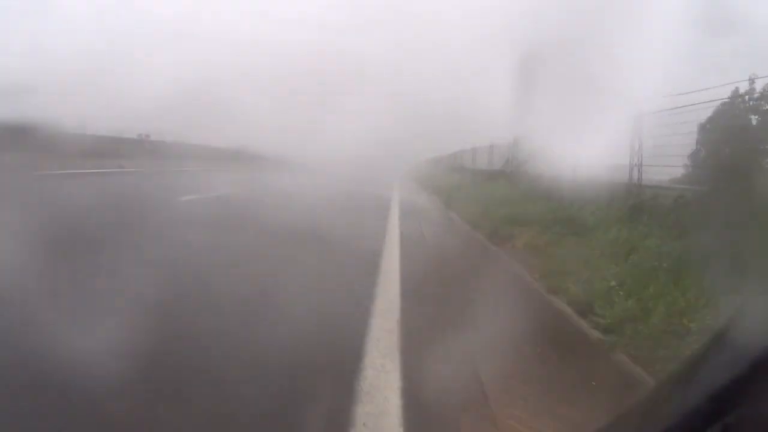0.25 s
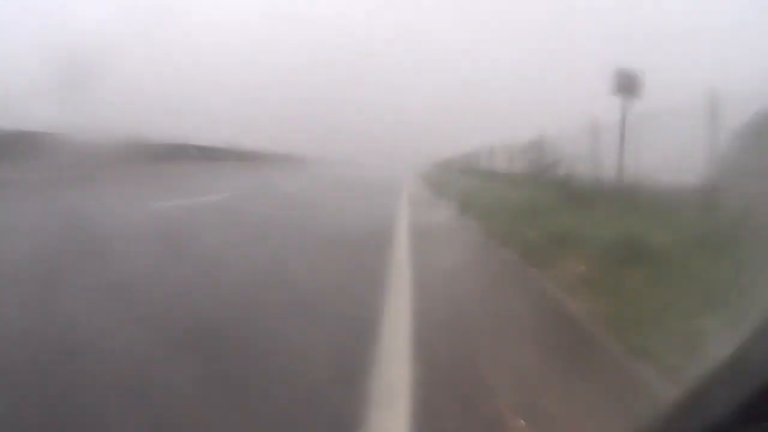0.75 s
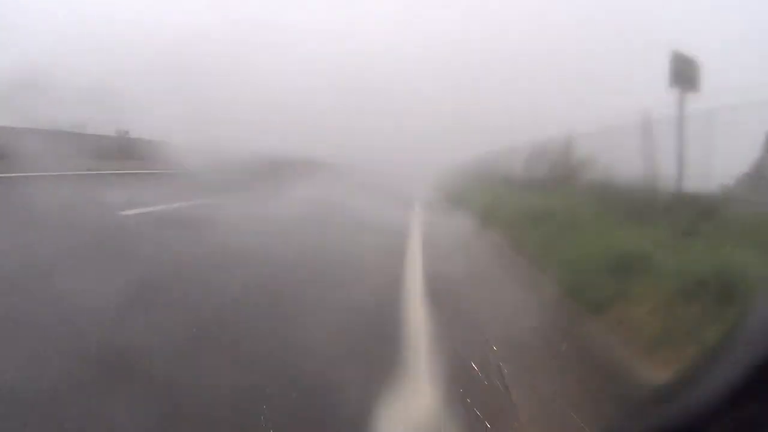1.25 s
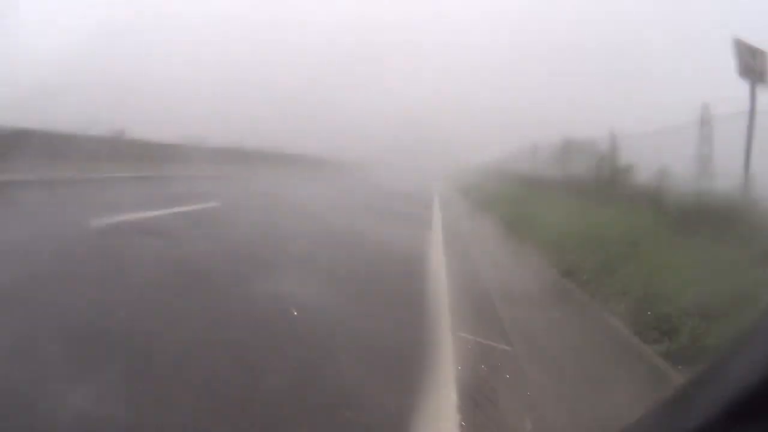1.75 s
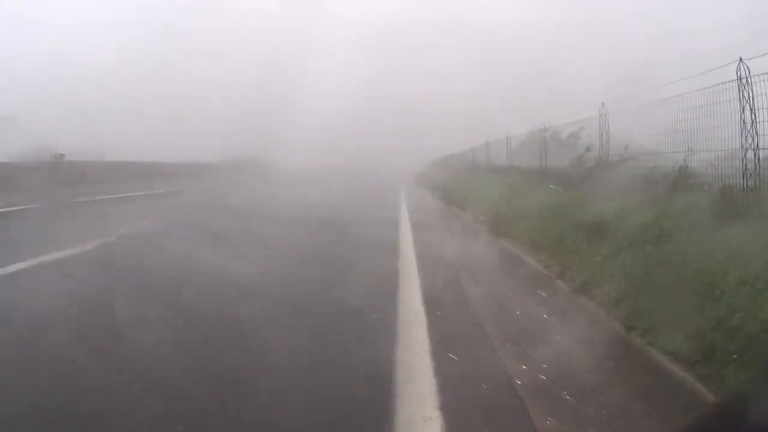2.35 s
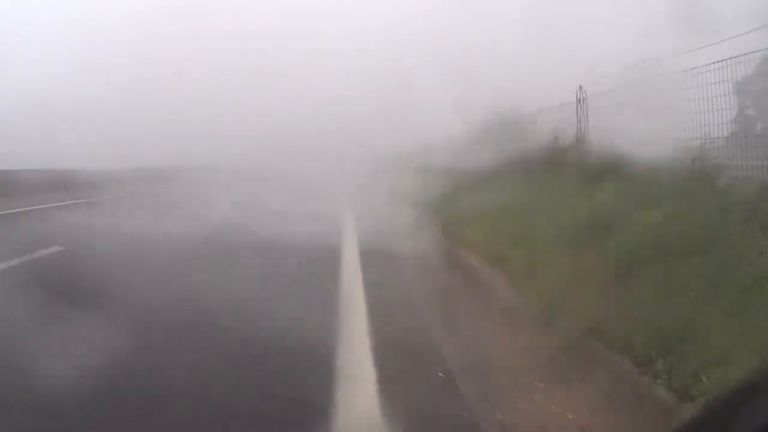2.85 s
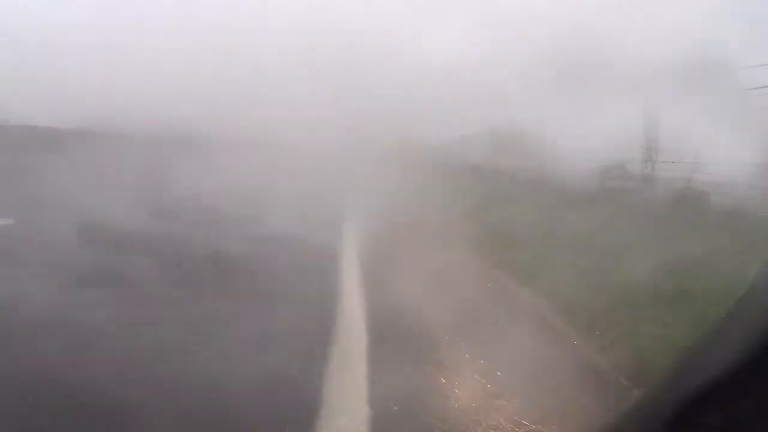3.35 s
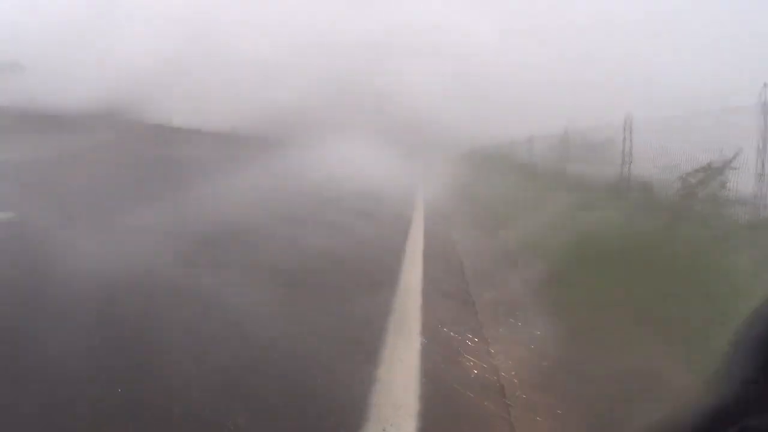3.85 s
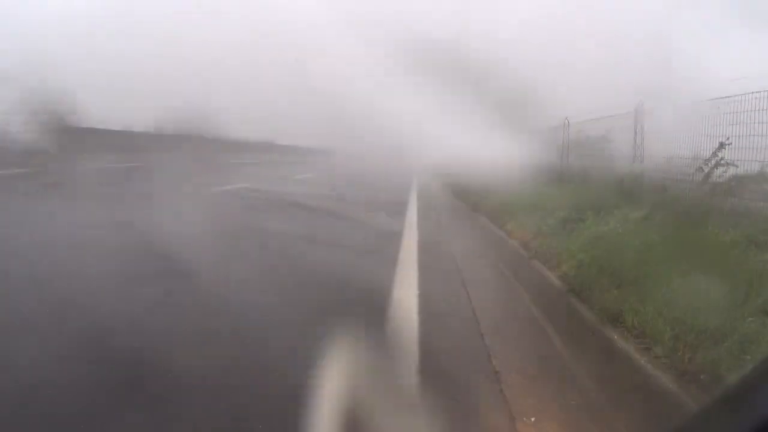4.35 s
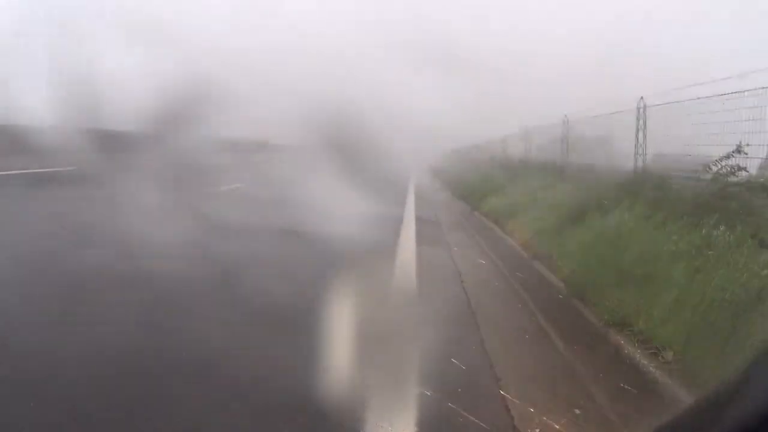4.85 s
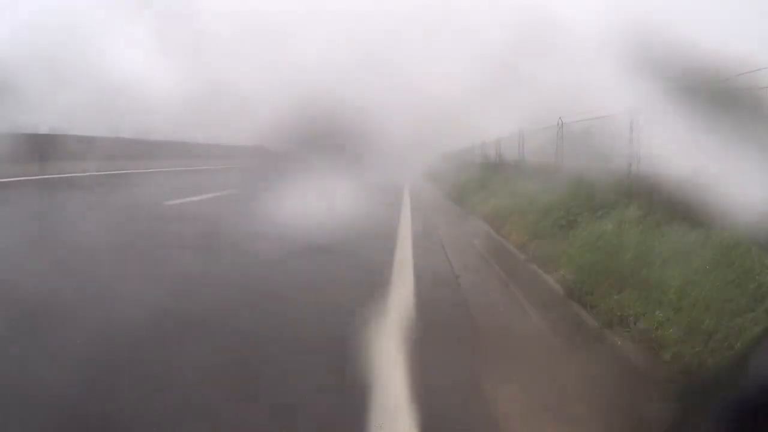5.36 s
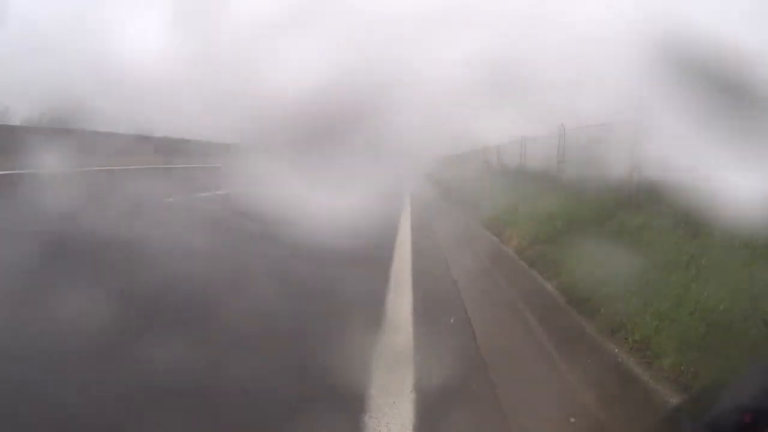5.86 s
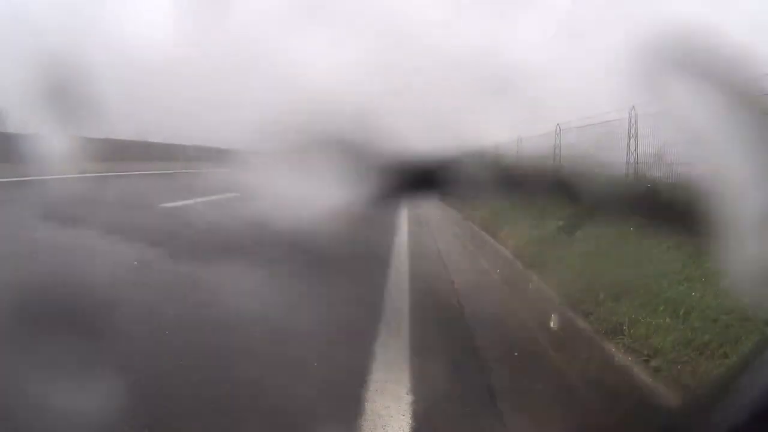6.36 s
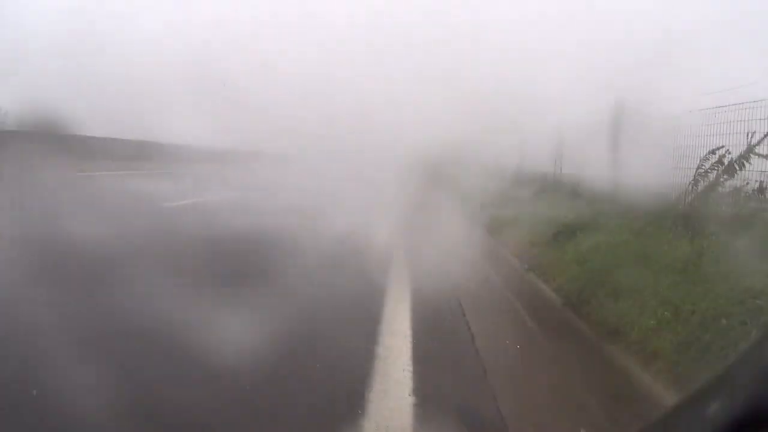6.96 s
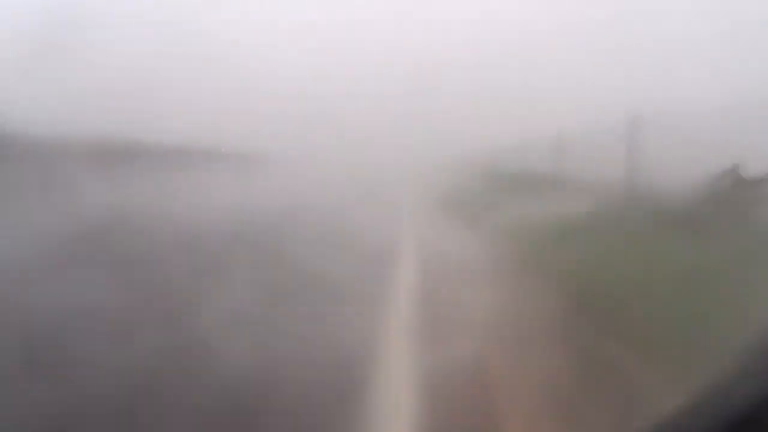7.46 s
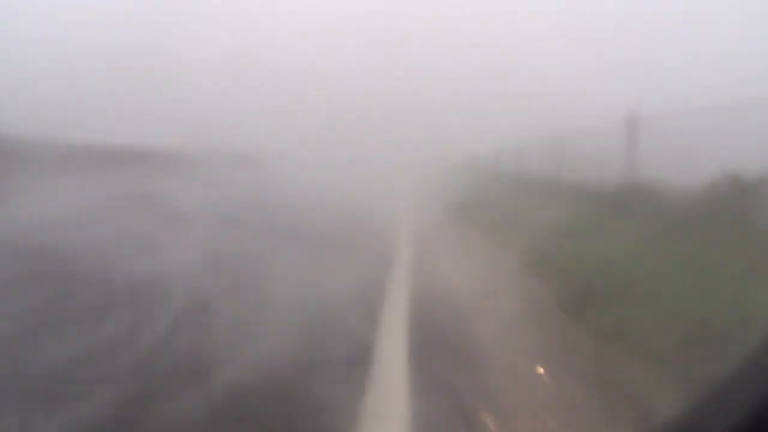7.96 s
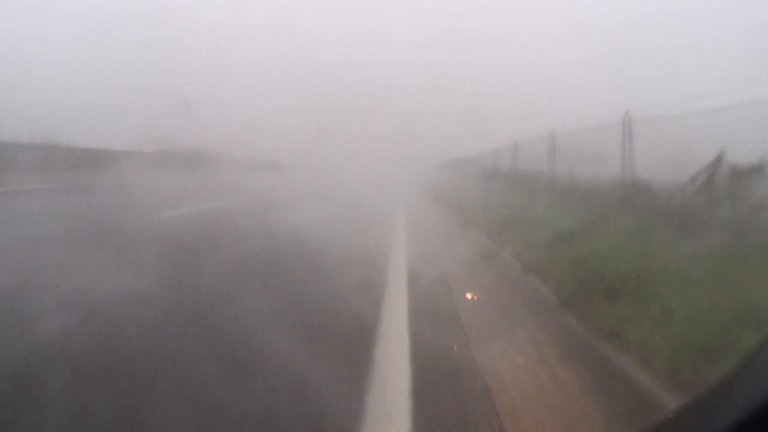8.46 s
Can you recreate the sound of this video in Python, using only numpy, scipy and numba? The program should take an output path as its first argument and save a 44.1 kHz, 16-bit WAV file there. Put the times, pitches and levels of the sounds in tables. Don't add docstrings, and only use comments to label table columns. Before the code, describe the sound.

Torrential rain pelts a mounted camera shell during a motorcycle ride. Dense crackling patter starts and stops in fractions of a second, punctuated by loud irregular pops and clicks, the hardest cluster just after two seconds. Underneath, gusty wind arrives as a dull low rumble with a quick engine flutter. The sound is very near, mid-heavy, slightly stereo, momentarily ducked after the largest drops; the ending is a sustained rain roar that thins out.

```python
import sys
import numpy as np
from scipy import signal
from scipy.fft import rfft, irfft, next_fast_len
from scipy.io import wavfile
from scipy.ndimage import uniform_filter1d
from numba import njit

SR = 44100
rng = np.random.default_rng(int(sys.argv[2]) if len(sys.argv) > 2 else 0)


def natural_amplitude(level_db):
    exponent = np.asarray(level_db, float) / 20
    return 10 ** exponent


def int16_out(signal):
    q = np.round(np.clip(np.atleast_2d(signal).T, -1, 1) * 32767)
    wavfile.write(sys.argv[1], SR, q.astype(np.int16))


N = 383669
SIZE = next_fast_len(N + SR // 4)
BIN_HZ = np.arange(SIZE // 2 + 1) * SR / SIZE
CONTROL_STEP = 64

# (time [s], half length [s], frequency [Hz], level [dB])
DRONES = [
    (2.097, 0.14, 86, -42),
    (3.75, 0.54, 57, -64),
]

# (time [s], half length [s], level [dB])
GUST_SWELLS = [(.1, 0.26, -38.5), (.47, 0.14, -36.5), (1.15, 0.23, -36.5), (.92, .08, -52),
               (1.45, 0.18, -37.5), (1.8, 0.14, -48), (2.2, 0.17, -38.5), (2.85, 0.17, -49),
               (3.5, 0.14, -34), (4.05, 0.15, -33), (4.63, 0.075, -36), (5.45, 0.11, -34),
               (5.72, 0.087, -40), (5.95, 0.23, -34), (6.55, 0.19, -34), (6.78, .1, -30), (7.1, 0.085, -32),
               (7.35, 0.059, -35.5), (7.7, 0.4, -39.5), (8.0, 0.11, -37), (8.58, 0.093, -31.5)]
# (time [s], half length [s], level [dB])
MOUNT_BUFFETS = [
    (1.3, 0.22, -66),
    (2.1, .25, -62),
    (4.0, 0.17, -66),
    (5.95, 0.14, -60),
    (6.85, 0.2, -51),
    (7.967, 0.07, -46),
    (8.7, 0.095, -46),
]
# (frequency [Hz], density [dB per Hz])
RUMBLE_SPECTRUM = [(59, -45), (100, -17), (156, -5), (253, 1.5), (307, -3.5), (344, -10.5), (380, -23.5),
                   (490, -22.5), (840, -120)]
# (frequency [Hz], density [dB per Hz])
DEEP_SPECTRUM = [(20, -5), (40, -8), (60, -3), (85, 1), (110, -5), (150, 6), (300, -31)]
AIRSTREAM_DB, GUST_FLUTTER_DB = -45.5, 0.5
DEEP_DB, DEEP_FOLLOWS_GUSTS, DEEP_FLUTTER_DB = -54.5, 0.15, 4
DUCK_DB_PER_DB, DUCK_S = 0.11, 0.04
FIRING_HZ = 49.6

# (start [s], held [s], level [dB], treble over level [dB])
RAIN_SHEETS = [(0.0, 0.033, -17.5, -3), (0.262, 0.073, -32.5, 7), (0.602, 0.051, -19, 1.5),
               (0.692, 0.15, -16, 1), (1.01, 0.014, -19.5, 1), (1.25, 0.021, -23, -11),
               (1.38, 0.097, -21, 1), (1.58, 0.098, -22, -1), (1.67, 0.052, -21.5, 1),
               (1.858, 0.027, -19.5, 2.5), (2.001, 0.13, -21, 0.5), (2.46, 0.22, -20, 1.5),
               (2.8, 0.047, -24, 2.5), (2.9, 0.17, -20.5, 1), (3.15, 0.13, -21.5, 0),
               (3.519, 0.22, -22.5, 2), (3.84, 0.084, -20, 0.5), (4.001, 0.21, -21, 1),
               (4.352, 0.089, -26, 5), (4.522, 0.13, -24, 2.5), (4.7, .3, -22.5, 2), (5.2, 0.099, -29, 2.5),
               (5.56, .1, -33, 1), (6.062, 0.075, -20, -1), (6.17, 0.052, -30, 1), (6.665, 0.017, -33, 7),
               (6.84, 0.16, -18, -0.5), (7.12, 0.12, -25, 2.5), (7.262, 1.16, -18.5, 0),
               (8.46, 0.2, -27.5, 7.5)]
ARRIVE_DB_PER_S, THIN_DB_PER_S = 726, 173
DRIZZLE_DB, DRIZZLE_TREBLE_DB, DRIZZLE_WANDER_DB = -32, -1, 2.5
# (start [s], length [s], depth [dB])
FAIRING_LULLS = [(0.033, 0.033, 14.5), (0.167, 0.014, 6), (0.333, 0.015, 11), (0.388, .04, 3.5),
                 (1.1, 0.024, 9), (1.162, 0.025, 3.5), (1.513, 0.038, 7), (1.803, 0.018, 8),
                 (2.157, 0.041, 8), (2.229, 0.012, 14), (2.272, 0.015, -4), (2.307, 0.0054, -10),
                 (2.368, 0.012, 7), (3.322, 0.051, 7.5), (4.2, 0.034, 8), (4.262, 0.021, 5),
                 (4.431, 0.075, 4), (4.648, 0.022, 4), (5.091, 0.042, 13), (5.311, 0.023, 11),
                 (5.362, 0.022, 15), (5.501, .02, 11), (5.535, 0.013, 27), (5.79, 0.086, 3.5),
                 (5.865, 0.048, 12), (6.27, 0.035, 19), (6.303, 0.052, 20), (6.379, 0.051, 11),
                 (6.753, 0.11, 6.5), (7.033, 0.089, 6.5)]
SHELTER_EDGE_S = 0.0024

# (time [s], peak level [dB])
KNOCK_DROPS = [(0.1955, -1), (0.3282, -13), (0.4359, -14), (0.5112, -12.5), (0.6055, -12), (0.6774, -31),
               (1.0874, -9), (1.2296, -11), (1.3423, -10), (1.8302, -17), (2.2493, 2.5), (2.6529, -6),
               (2.9033, -25), (3.05, -23), (4.5116, -19), (5.0838, -15), (5.5513, -19), (5.6221, -12.5),
               (5.7334, -10), (5.876, -14), (5.9803, -17), (6.0257, -20), (6.3086, -17), (6.3415, -19),
               (6.3674, -8.5), (6.4288, -18), (6.6777, -12), (6.8149, -19), (6.9895, -6.5), (7.654, -8.5)]
RING_DROPS = [(0.0426, -9), (0.1494, -6), (0.3304, -7), (0.356, -14), (0.4297, -13), (0.511, -13),
              (0.9634, -9.5), (1.066, -3), (1.0873, -17), (1.1331, -9), (1.253, -14), (1.3362, -8),
              (1.5933, -4), (2.0702, 3), (2.2653, 1), (2.331, -7.5), (2.38, -5), (2.9033, -13),
              (2.9444, -11), (3.8124, -22), (4.2343, -21), (5.083, -11), (5.3906, -9.5), (6.3081, -18),
              (6.428, -13), (6.8149, -9.5), (6.859, -10), (7.1975, -9.5), (7.2594, -21), (7.449, -12)]
SNAP_DROPS = [(0.2186, -15), (0.4287, -12.5), (0.5734, -2.5), (0.601, -16), (0.9828, -12), (1.2532, -10),
              (1.3096, -15), (1.3438, -5), (1.3716, -11), (1.7975, -12), (2.1784, -13), (2.2435, 4.5),
              (2.2657, -1.5), (2.2897, -7), (2.3795, -10), (2.901, -12), (3.814, -8), (4.7147, -9),
              (5.0826, -7), (5.1114, -13), (5.5156, -12), (5.5513, -7.5), (5.7047, -13.5), (5.837, -21),
              (6.026, -28), (6.309, -36), (6.3089, -15.5), (6.429, -29), (6.754, -16), (6.8375, -7)]
# (time [s], peak level [dB], brightness [dB])
TILTED_DROPS = [(1.046, -3, 9.5), (1.2773, -2, -4), (1.4115, -10, -10), (1.7684, -21, -11), (1.8006, -25, 15),
                (1.9312, -8, 3), (1.9609, -11, 1), (2.3436, -5, 0.5), (2.4011, -4, -2), (2.4262, -6, -4),
                (2.436, -9.5, 6), (2.7478, -9, 5), (2.7859, -7.5, -2), (3.2811, -6, 7.5), (3.7911, -2, 1),
                (3.8521, -2, -1.5), (4.007, 4.5, -5), (4.2545, -12, 2.5), (4.2985, -9, 6), (4.4298, 1, -3),
                (4.4574, -17, 5), (4.6384, -6.5, 6), (5.0016, -5.5, 3), (5.1972, -5.5, 2.5),
                (5.5235, -1, 2.5), (5.679, -5, -3.5), (6.2551, -6, 3), (6.2758, -10.5, -3),
                (6.3835, -7.5, -6.5), (6.4766, -13, -6)]
# (time [s], peak level [dB])
SHELL_SPLATS = [
    (0.516, -25),
    (1.086, -23),
    (1.45, -31),
    (4.429, -15.5),
    (4.996, -18.5),
    (5.082, -26),
    (6.364, -22),
    (6.369, -17.5),
    (6.675, -29),
    (7.074, -24),
]
KNOCK_MIX_DB, RING_MIX_DB, SNAP_MIX_DB = (1, -4, -10.5), (-11, -0.5, -12), (-6, -7.5, -0.5)
STRAYS_PER_S, STRAY_DB, STRAY_SCATTER_DB = 6, -18, 6.5
STRAY_SHELTER_DB_PER_DB = 1.43

# (frequency [Hz], t60 [s], gain in both ports alike [dB], gain in ports opposed [dB])
THUD_SHELL_MODES = [(394, 0.0073, -21, -30.5), (547, 0.01, -19, -26), (756, 0.012, -16, -21)]
KNOCK_SHELL_MODES = [(977, 0.0024, -12, -16), (1272, 0.0095, 0.5, -11.5), (1460, 0.013, -10, -14.5)]
RING_SHELL_MODES = [(1640, 0.058, -10, -26), (1830, 0.01, 1, -14), (2080, 0.0012, -6, -13)]
SNAP_SHELL_MODES = [(2700, 0.011, -10, -25.5), (2948, 0.0039, -4, -9.5), (3522, 0.0067, -10, -6.5),
                    (3905, 0.0026, -19.5, -13)]
FIZZ_SHELL_MODES = [(5170, 0.0024, -23.5, -48), (6670, 0.0017, -26.5, -27.5), (7710, 0.0021, -26, -30.5),
                    (10510, 0.01, -38, -47)]
SKIRT = 0.3
DROPS_PER_S, SMALL_BLOW_DB = 1400, -6
SPLASH_S, SPLASH_DB = 0.00018, -5
RUNOFF_S, RUNOFF_DB = 0.0018, -5
LINK = 0.18

# (frequency [Hz], left minus right [dB])
PORT_TILT = [(60, 0.5), (110, -0.5), (190, -0.5), (340, -1), (620, -2), (1110, -1.5), (1980, -1), (3550, 3),
             (6360, -2.5), (11400, -0.5)]
# (frequency [Hz], gain [dB])
TOP_CUT = [(100, 0.5), (10900, -1), (11150, -4), (11350, -12), (12000, -20), (16000, -60)]


def through(x, response):
    return irfft(rfft(x, SIZE) * response, SIZE)[..., :N]


def unit(x):
    return x / np.sqrt(np.mean(x ** 2))


def colour(points):
    hz, db = np.transpose(points)
    return natural_amplitude(np.interp(np.log(BIN_HZ + 1), np.log(hz), db))


def walk(rate_hz):
    hold = int(SR / rate_hz)
    steps = np.repeat(rng.standard_normal(N // hold + 1), hold)
    return 1.48 * uniform_filter1d(uniform_filter1d(steps, hold), hold)[:N]


def swells(table, floor_db):
    t = np.arange(0, N, CONTROL_STEP) / SR
    power = sum(natural_amplitude(2 * db) * np.exp(-((t - s) / half_s) ** 2) for s, half_s, db in table)
    return 10 * np.log10(natural_amplitude(2 * floor_db) + np.interp(np.arange(N) / SR, t, power))


def drones():
    t = np.arange(N) / SR
    out = np.zeros(N)
    for s, half_s, hz, db in DRONES:
        cycles = np.cumsum(hz * (1 + 0.062 * walk(9.7))) / SR
        out += natural_amplitude(db) * np.exp(-((t - s) / half_s) ** 2) * np.sin(2 * np.pi * cycles)
    return out


def wind(patter_db):
    gust_db = swells(GUST_SWELLS, AIRSTREAM_DB)
    loud_db = uniform_filter1d(patter_db, int(DUCK_S * SR)) + 30.5
    rumble_db = gust_db - DUCK_DB_PER_DB * loud_db + GUST_FLUTTER_DB * walk(6)
    deep_db = swells(MOUNT_BUFFETS, DEEP_DB + DEEP_FOLLOWS_GUSTS * (gust_db + 28))
    return rumble_db, deep_db + DEEP_FLUTTER_DB * walk(6.4)


def rumble(rumble_db, deep_db):
    firing = np.cumsum(FIRING_HZ * (1 + 0.0273 * walk(5.2))) / SR
    throb = 1 + 0.22 * np.cos(2 * np.pi * firing)
    noise = rng.standard_normal((4, N))
    buffeted = noise[:2] * throb * natural_amplitude(1.5 * walk(15))
    body = unit(through(buffeted, colour(RUMBLE_SPECTRUM))) * natural_amplitude(rumble_db)
    deep = unit(through(noise[2:], colour(DEEP_SPECTRUM))) * natural_amplitude(deep_db)
    side = natural_amplitude(-17) * body[1] + natural_amplitude(-12) * deep[1]
    return body[0] + deep[0] + np.array([side, -side])


def sheets():
    t = np.arange(0, N, CONTROL_STEP) / SR
    start, held, db, sheet_treble_db = np.transpose(RAIN_SHEETS)[:, :, None]
    arriving_db = ARRIVE_DB_PER_S * np.maximum(start - t, 0)
    thinning_db = THIN_DB_PER_S * np.maximum(t - start - held, 0)
    power = natural_amplitude(2 * (db - arriving_db - thinning_db))
    drizzle = natural_amplitude(2 * (DRIZZLE_DB + DRIZZLE_WANDER_DB * walk(9)[::CONTROL_STEP]))
    total = power.sum(axis=0) + drizzle
    treble_db = ((power * sheet_treble_db).sum(axis=0) + drizzle * DRIZZLE_TREBLE_DB) / total
    return [np.interp(np.arange(N) / SR, t, c) for c in (10 * np.log10(total), treble_db)]


def shelter():
    db = np.zeros(N)
    for s, length_s, depth_db in FAIRING_LULLS:
        db[int(s * SR):int((s + length_s) * SR)] = depth_db
    return uniform_filter1d(db, int(SHELTER_EDGE_S * SR))


def big_drops(shelter_db):
    rows = []
    for table, mix_db in ((KNOCK_DROPS, KNOCK_MIX_DB), (RING_DROPS, RING_MIX_DB), (SNAP_DROPS, SNAP_MIX_DB)):
        rows += [(s, *(db + np.array(mix_db))) for s, db in table]
    rows += [(s, db - 6 - bright_db, db - 1.5, db - 4.5 + bright_db) for s, db, bright_db in TILTED_DROPS]
    count = int(STRAYS_PER_S * N / SR)
    at = rng.integers(N, size=count)
    stray_db = STRAY_DB + STRAY_SCATTER_DB * rng.standard_normal((count, 3))
    stray_db -= STRAY_SHELTER_DB_PER_DB * shelter_db[at, None]
    return np.vstack([rows, np.column_stack([at / SR, stray_db])]).T


def strikes(s, size):
    return np.bincount(np.minimum((s * SR).astype(int), N - 1), size, N)


def splashes(s, size, splash_s):
    pole = np.exp(-1 / (splash_s * SR))
    force = signal.lfilter([1 - pole], [1, -2 * pole, pole ** 2], strikes(s, size))
    return force / np.sqrt(splash_s * SR)


def causal(power):
    cepstrum = irfft(np.log(power + 1e-18) / 2, SIZE)
    cepstrum[1:SIZE // 2] *= 2
    cepstrum[SIZE // 2 + 1:] = 0
    return np.exp(rfft(cepstrum))


def modes(table):
    alike, opposed = 0, 0
    for hz, t60_s, alike_db, opposed_db in table:
        off = (BIN_HZ - hz) / (np.log(1000) / (2 * np.pi * t60_s))
        skirts = 1 + ((BIN_HZ / hz - 1) / SKIRT) ** 4
        ring = np.minimum((BIN_HZ + 1) / hz, 1) ** 4 / (1 + off ** 2) / skirts
        alike = alike + natural_amplitude(2 * alike_db) * ring
        opposed = opposed + natural_amplitude(2 * opposed_db) * ring
    return causal(alike), causal(opposed)


def shake(table, s, small_db, hit_s, hit_db, mist, spray):
    alike, opposed = modes(table)
    small = natural_amplitude(small_db + 4.48 * rng.standard_normal(len(s)))
    hit = natural_amplitude(hit_db) / np.abs(irfft(alike, SIZE)).max()
    sign = np.sign(spray[1])
    hit_lean = rng.standard_normal(len(hit_s))
    small_lean = LINK * sign[(s * SR).astype(int)] + 0.89 * rng.standard_normal(len(s))

    splash = splashes(s, small * natural_amplitude(SMALL_BLOW_DB), SPLASH_S)
    splash = splash + splashes(hit_s, hit * natural_amplitude(SPLASH_DB), 2 * SPLASH_S)
    splash = splash + splashes(hit_s, hit * natural_amplitude(RUNOFF_DB), RUNOFF_S) + mist
    blows = strikes(hit_s, hit) + strikes(s, small * natural_amplitude(SMALL_BLOW_DB))
    mid = through(splash * spray[0] + sign * blows, alike)

    side_spray = LINK * spray[0] + np.sqrt(1 - LINK ** 2) * spray[1]
    side_blows = strikes(hit_s, hit_lean * hit)
    side_blows = side_blows + strikes(s, small * natural_amplitude(SMALL_BLOW_DB - 2.5) * small_lean)
    side = through(splash * side_spray + side_blows, opposed)
    return np.array([mid + side, mid - side])


def rain(patter_db, treble_db, drops):
    chance = rng.random((int(DROPS_PER_S * N / SR), 2))
    s = chance[:, 0] * N / SR
    at = (s * SR).astype(int)
    spread_db = 7.0 - 0.12 * (patter_db[at] + 35.0)
    excess = np.minimum(-np.log(1 - chance[:, 1]), 3.5)
    small_db = patter_db[at] + spread_db * excess + 1.06 * walk(30)[at] + 21.5
    spray = rng.standard_normal((2, N))
    mist_flutter_db = (3.5 - 0.2 * (patter_db + 22)) * walk(60)
    mist = natural_amplitude(patter_db + treble_db + mist_flutter_db + 3.5)

    big_s, knock_db, ring_db, snap_db = drops
    splat_s, splat_db = np.transpose(SHELL_SPLATS)
    thud_over_db = 2 - 0.47 * (patter_db[at] + 24.5)
    snap_over_db = treble_db[at] + 3
    fizz_over_db = 1.9 * treble_db[at] + 2
    groups = ((THUD_SHELL_MODES, thud_over_db, splat_s, splat_db + 3.5),
              (KNOCK_SHELL_MODES, -0.5, big_s, knock_db),
              (RING_SHELL_MODES, -0.5, big_s, ring_db - 0.5),
              (SNAP_SHELL_MODES, snap_over_db, big_s, snap_db + 5),
              (FIZZ_SHELL_MODES, fizz_over_db, big_s, snap_db - 11))
    return sum(shake(table, s, small_db + over_db, hit_s, hit_db, mist, spray)
               for table, over_db, hit_s, hit_db in groups)


def scene():
    patter_db, treble_db = sheets()
    shelter_db = shelter()
    background = drones() + rumble(*wind(patter_db))
    return background + rain(patter_db - shelter_db, treble_db, big_drops(shelter_db))


@njit
def limit(x, top, release, ahead):
    gain, e = np.empty(len(x)), top
    for i in range(len(x)):
        e = max(x[min(i + ahead, len(x) - 1)], top + (e - top) * release)
        gain[i] = top / e
    return gain


def roll_off(x):
    return signal.sosfilt(signal.butter(12, 11990, fs=SR, output="sos"), x)


def record(dry):
    tilt = np.sqrt(colour(PORT_TILT))
    ports = through(dry, np.array([tilt, 1 / tilt]))
    gain = limit(np.abs(ports).max(axis=0), 0.72, np.exp(-1 / (0.022 * SR)), ahead=8)
    held = ports * uniform_filter1d(gain, size=16)
    mix = through(held, colour(TOP_CUT))
    return roll_off(mix)


dry = scene()
out = record(dry)
int16_out(out)
```